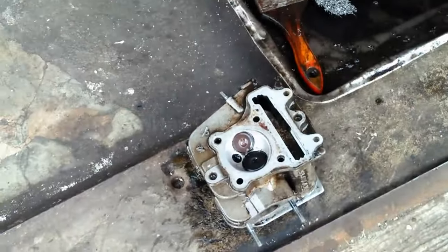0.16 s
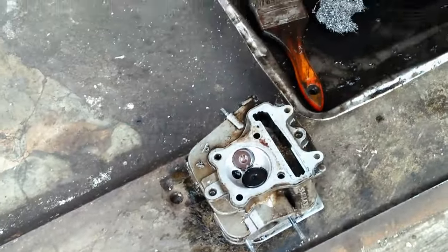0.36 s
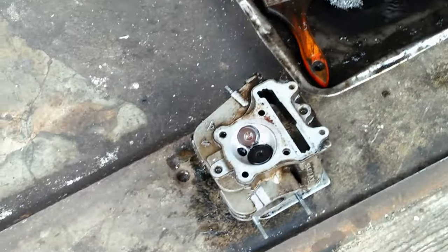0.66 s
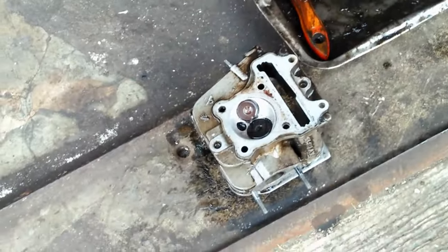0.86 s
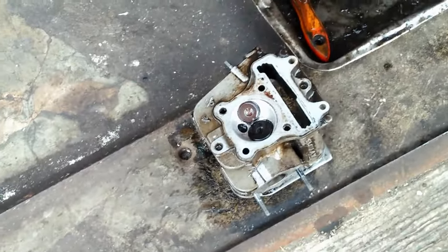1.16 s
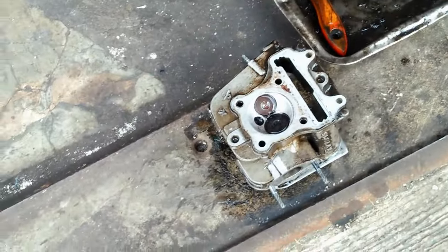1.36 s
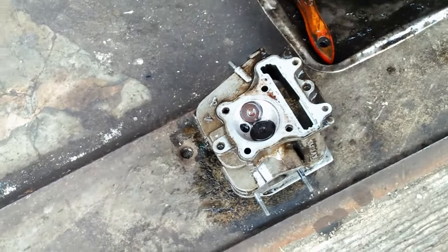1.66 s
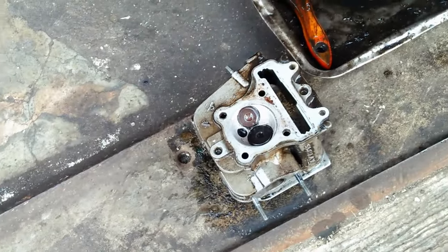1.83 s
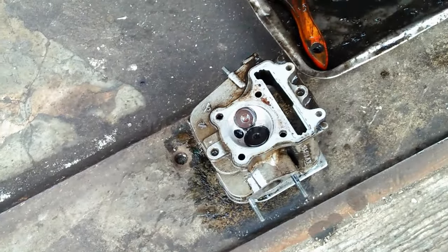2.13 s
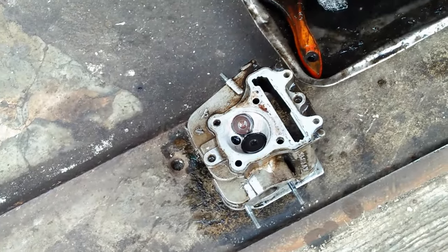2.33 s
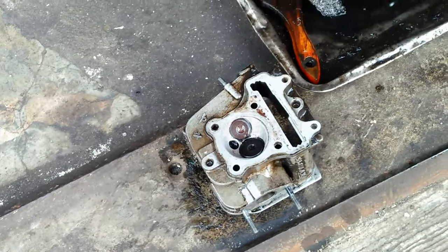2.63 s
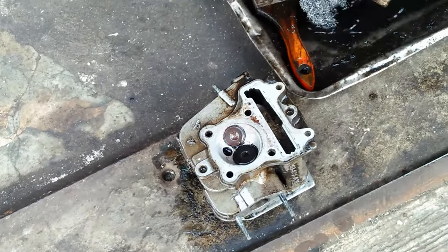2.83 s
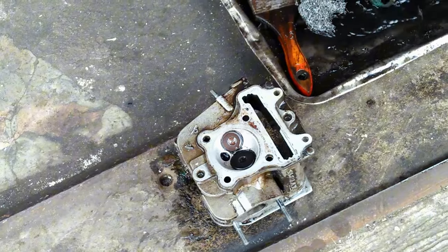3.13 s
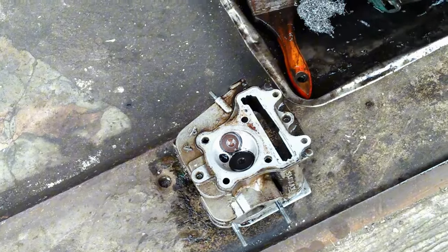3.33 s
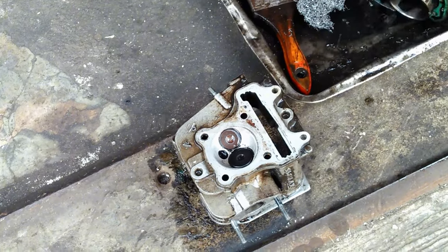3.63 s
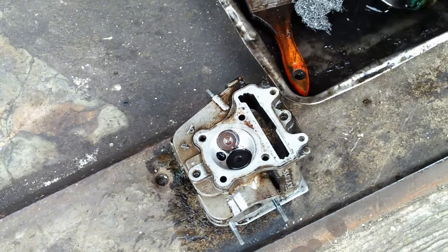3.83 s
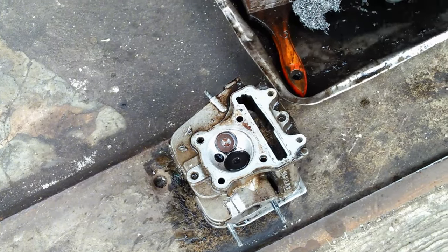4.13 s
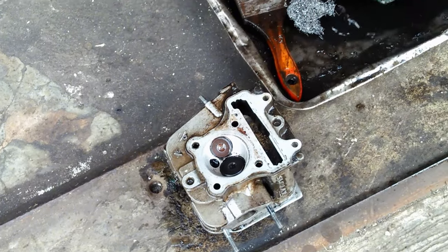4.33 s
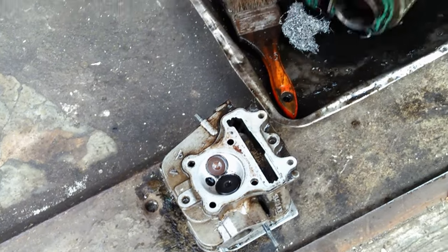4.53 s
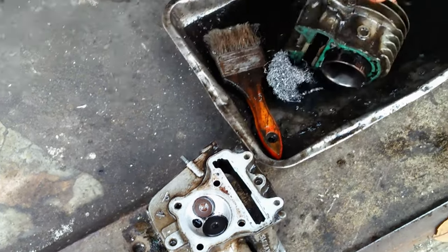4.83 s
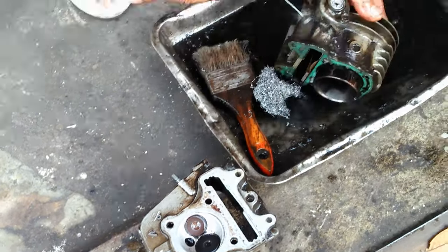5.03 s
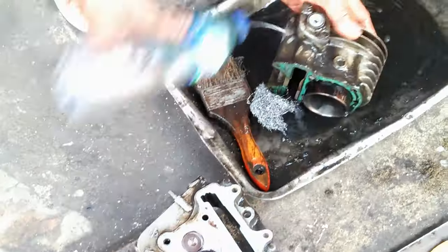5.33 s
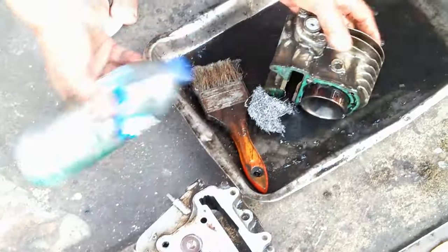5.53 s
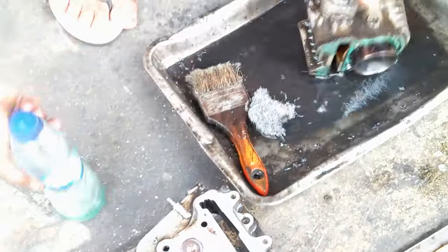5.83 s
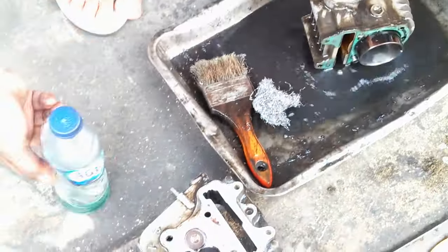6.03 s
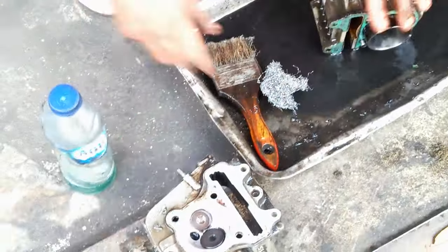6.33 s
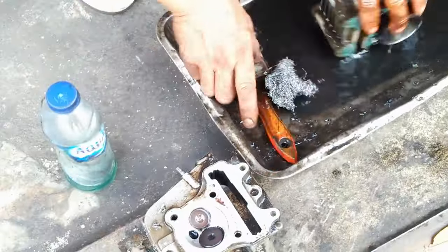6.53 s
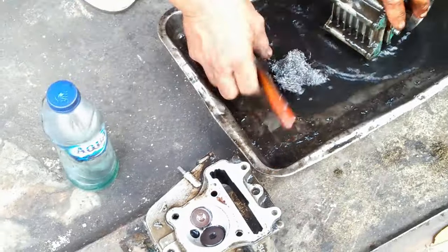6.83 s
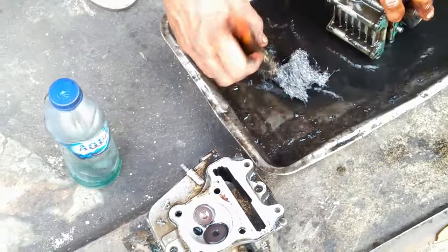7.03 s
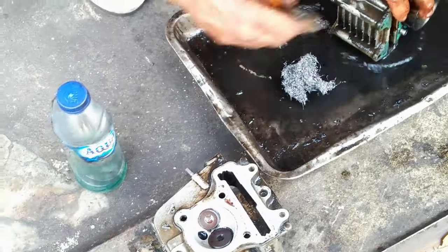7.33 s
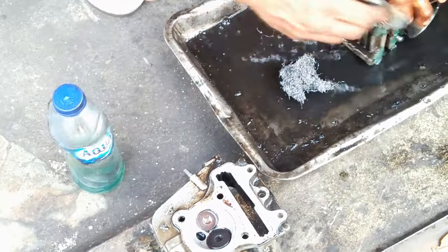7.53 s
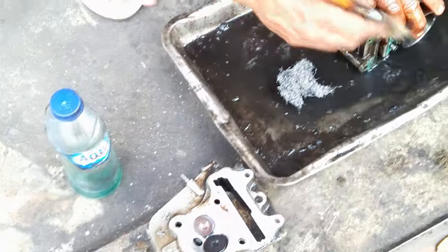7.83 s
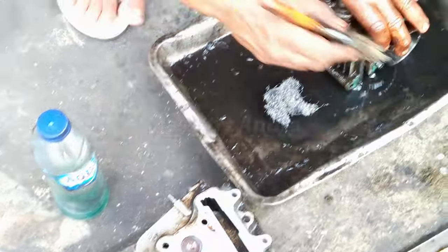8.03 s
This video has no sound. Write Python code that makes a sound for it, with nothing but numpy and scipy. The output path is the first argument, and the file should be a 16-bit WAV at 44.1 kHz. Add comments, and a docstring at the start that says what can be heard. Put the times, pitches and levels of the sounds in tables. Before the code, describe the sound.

Outdoors, close to a shallow sheet-metal tray. From 0 to 0.7 s a cast metal part clinks and scrapes with dry, very short ringing and bright grit, over faint wet hiss. From 1 to 2.4 s come sparser light knocks, a tight cluster near 1.9 s and a barely audible squeak at 1.5 s. Between 2.8 and 4.8 s knocks and slides grow busier, strongest around 3.3 and 4.7 s, with spatter ticks and brief sloshes. It is calmer around 5 s; faint clicks follow at 5.5 s, a tiny squeak at 5.8 s, a loud clank with a thud at 5.95 s and crisp taps at 6.2-6.4 s. From 6.5 s bristle hiss, scrapes and knocks thicken, with heavy hits at 7.65-8 s. Short wall echoes and a far idling motor sit behind; road roar rises from 5.5 s, and a rumbling vehicle nears at the end.

```python
"""Knocks, short scrapes and clicking taps ring a sheet-metal tray outdoors, close by: a cast engine part is
turned, rinsed and brushed. Contacts are noise bursts driving damped modes, a dry clink and bright grit.
Soft thuds, spatter ticks and two squeaks join them; solvent and bristles hiss as shaped noise with ticks.
Behind are wall echoes, road noise and a far idling motor; one vehicle draws near at the end."""
import sys
import numpy as np
from scipy import signal
from scipy.fft import rfft, irfft, next_fast_len
from scipy.io import wavfile
from scipy.ndimage import uniform_filter1d

SR = 44100
rng = np.random.default_rng(int(sys.argv[2]) if len(sys.argv) > 2 else 0)


def store_pcm(level_fs):
    """Save levels as 16-bit WAV."""
    pcm = np.round(np.clip(level_fs, -1, 1) * 32767).astype(np.int16)
    wavfile.write(sys.argv[1], SR, np.atleast_2d(pcm).T)


def amplitude_ratio(level_db):
    """Convert a level in decibels to the matching linear amplitude (field) ratio."""
    exponent = np.asarray(level_db, float) / 20
    return 10 ** exponent


N = 360738

# part knocks tray: (force peak [s], low ring [dB], high ring [dB], grit [dB], contact decay [ms])
KNOCKS = [(0.155, -44.5, -36, -40, 2.8), (0.289, -38.5, -38.5, -44.5, 16), (0.602, -63, -49, -50.5, 5.2),
          (1.175, -50.5, -56, -67, 9), (1.21, -56.5, -57, -62, 19), (1.303, -53.5, -55, -67, 14),
          (1.509, -41, -37, -51, 14.3), (1.862, -55, -46, -55, 16), (1.877, -43, -34, -41.5, 4.5),
          (1.894, -40, -37.5, -47, 6.2), (1.923, -54, -54, -53, 4.5), (2.277, -48.5, -48, -61, 36),
          (2.39, -51, -60, -64.5, 9.6), (2.826, -41.5, -41, -58.5, 21), (2.915, -38, -42.5, -55, 20.4),
          (3.131, -63, -58, -71, 12), (3.35, -42, -53, -61, 11), (3.537, -64, -52, -66, 8),
          (3.561, -39, -38, -44, 12), (3.703, -51, -48.5, -58, 24), (3.727, -46.5, -56, -60.5, 7.3),
          (4.016, -35.5, -37, -68, 18), (4.089, -52, -47, -51, 7.5), (4.279, -44.5, -43.5, -47.5, 19),
          (4.516, -56, -53.5, -62, 0.93), (4.712, -34.5, -38.5, -51, 48), (4.821, -47.5, -59, -53, 4.1),
          (5.133, -49.5, -55.5, -64, 17), (5.937, -37, -36, -57, 9), (5.952, -28, -28, -49.5, 73),
          (6.443, -56, -47, -72, 88), (6.555, -57, -42, -51, 7.3), (6.9, -40, -35, -45, 14),
          (7.09, -45, -34.5, -40, 3), (7.237, -38.5, -35, -53.5, 19), (7.655, -38, -38, -52, 18),
          (7.796, -28.5, -39, -52, 22), (7.975, -31, -29, -35, 12)]
# part slides on tray: (force peak [s], low ring [dB], high ring [dB], grit [dB], contact decay [ms])
SCRAPES = [(0.143, -44.5, -52, -76, 6), (0.315, -41.5, -34.5, -48, 19.7), (0.373, -46, -44, -57.5, 29),
           (0.478, -60, -52.5, -59.5, 10), (0.641, -66, -62, -63, 6.4), (1.035, -64, -81, -75, 13),
           (1.14, -53.5, -62, -59, 33), (1.579, -48.5, -44, -52.5, 10), (1.746, -84, -69, -69, 38),
           (2.851, -41, -39, -57, 27.6), (2.991, -48, -55, -74.5, 53), (3.082, -60, -53.5, -80, 7.8),
           (3.268, -33.5, -35, -56.5, 9.7), (3.319, -32, -30.5, -47, 16.4), (3.581, -39, -30, -42, 6.8),
           (3.789, -46.5, -41, -53.5, 6.8), (4.027, -39, -44, -61.5, 16), (4.156, -43.5, -40.5, -55, 31),
           (5.203, -62, -54.5, -79, 18), (6.101, -43.5, -43, -53, 7.7), (6.639, -47.5, -40, -55.5, 20),
           (6.681, -49, -45, -57, 24), (6.722, -58, -41.5, -60, 19), (6.828, -43.5, -36.5, -52, 20),
           (6.944, -45.5, -40.5, -71, 48), (7.046, -55, -41.5, -71, 14), (7.171, -64, -45, -64, 68),
           (7.393, -44, -61, -73, 19), (7.619, -43, -67, -74, 22), (7.688, -30, -30.5, -42.5, 18),
           (7.752, -37.5, -44, -49, 19)]
# dry, clicking taps of bottle or handle, some faint, some loud:
# (force peak [s], low ring [dB], high ring [dB], clink [dB], contact decay [ms])
TAPS = [(0.405, -51, -46, -40, 3.5), (0.561, -54, -61, -53.5, .5), (3.397, -61, -49, -48, 1.3),
        (5.477, -55, -45.5, -52, 1.7), (5.499, -61, -51, -58, 2.4), (5.538, -42, -40.5, -57.5, 1.6),
        (5.588, -49, -57, -62.5, 2), (5.627, -46.5, -51, -73, 2.4), (6.186, -46, -32.5, -43.5, 0.63),
        (6.22, -61, -58, -74, 3.7), (6.244, -40.5, -26.5, -35, 3), (6.376, -39, -29, -35.5, 4.6)]


def contacts():
    """Rows of (s, low dB, high dB, clink dB, grit dB, rise ms, contact ms, share of the ring time)."""
    rows = []
    for s, low_db, high_db, grit_db, contact_ms in KNOCKS:
        rise_ms = 0.89 * abs(contact_ms) ** 0.45
        rows.append((s, low_db, high_db, grit_db + 1.5, grit_db, rise_ms, contact_ms, 1))
    for s, low_db, high_db, grit_db, contact_ms in SCRAPES:
        rise_ms = 0.78 * contact_ms  # swells about as slowly as it fades
        rows.append((s, low_db, high_db, grit_db + 2.5, grit_db, rise_ms, contact_ms, 1))
    for s, low_db, high_db, clink_db, contact_ms in TAPS:
        # held in the hand: shorter ring, little grit
        rows.append((s, low_db, high_db, clink_db, clink_db - 10, 1.15, contact_ms, 0.61))
    return rows


# tray modes, damped by floor and solvent, before each blow's variation: (frequency [Hz], level [dB], t60 [s])
TRAY_MODES = [(590.6, -11, 0.077), (655, -9.5, 0.029), (732.4, -13, 0.055), (811, -10.5, 0.027),
              (900.7, -4.5, 0.055), (1006, -3.5, 0.036), (1057, -3.5, 0.022), (1199, 1, 0.017),
              (1246, 7, 0.014), (1473, 7, 0.029), (1520, 1, .03), (1569, 15.5, 0.018), (1655, 1, 0.06),
              (1822, 1, 0.022), (1918, -7.5, 0.069), (2028, 6, 0.017), (2221, 4, 0.016), (2371, -2.5, 0.02),
              (2405, -3.5, 0.011), (2585, -15.5, 0.043), (2890, -19.5, 0.073)]
# dry clink of the casting, too short to ring: (frequency [Hz], density [dB per Hz])
CLINK_SPECTRUM = [(1800, -35), (2700, -3), (3300, -6), (3800, -4.5), (4400, 2), (4900, -2), (5500, -9),
                  (6200, -16), (7500, -32)]
# grit: (frequency [Hz], density [dB per Hz])
GRIT_SPECTRUM = [(4500, -53), (6300, -8), (7200, 1.5), (8300, 4.5), (10500, -0.5), (12000, 1), (13800, 3),
                 (16000, -10)]
RING_SPLIT_HZ, LEAD_MS = 1200, 45


def knock(low_db, high_db, clink_db, grit_db, rise_ms, contact_ms, damp, chance):
    """An uneven burst of slips drives tray and casting and sheds bright grit."""
    ms = np.arange(8192) * 1000 / SR - LEAD_MS
    after_ms = np.maximum(ms, 0)
    rise = np.clip(1 + ms / (2.24 * max(rise_ms, 0.2)), 0, 1)
    force = rise * np.exp(-after_ms / max(contact_ms, 0.3))
    stutter = amplitude_ratio(3.16 * evened(uniform_filter1d(chance[1], size=90)))
    slips = force * stutter * chance[0]

    low_modes = [mode for mode in TRAY_MODES if mode[0] < RING_SPLIT_HZ]
    high_modes = [mode for mode in TRAY_MODES if mode[0] >= RING_SPLIT_HZ]
    low = ring(low_modes, slips, chance[2], damp=damp)
    high = ring(high_modes, slips, chance[2, 50:], hard=14 / (1 + rise_ms), damp=damp)

    # the shorter the contact, the stronger the single click added to clink and grit
    impulse = np.arange(len(ms)) == round(LEAD_MS * SR / 1000)
    click = impulse * np.linalg.norm(slips) * 1.9 / (1 + contact_ms)
    clink = colour(slips + click, CLINK_SPECTRUM)
    shed = slips * np.exp(-after_ms / 94.0)  # grit is spent sooner than the ring
    grit = colour(shed + 0.6 * click, GRIT_SPECTRUM)
    return topped(low, low_db) + topped(high, high_db) + topped(clink, clink_db) + topped(grit, grit_db)


def ring(table, drive, spot, hard=0, damp=1):
    """Drives decaying modes; the spot sets strength, sign and bend, a hard blow lifts the upper modes."""
    t = np.arange(len(drive)) / SR
    hz, db, t60 = np.transpose(table)[:, :, None]
    strength, bend = spot[:2 * len(table)].reshape(2, -1, 1)
    level_db = db + 2.5 * strength + hard * np.log2(hz / hz[0])
    modes = amplitude_ratio(level_db - 60 * t / (t60 * damp))
    modes = modes * np.sin(2 * np.pi * hz * (1 + 0.032 * bend) * t)
    modes *= np.sign(bend) * (1 - np.exp(-t * hz * 1.27))  # the metal takes a cycle to move
    return signal.fftconvolve(drive, modes.sum(0))[:len(t)]


# heavy part meets tray floor: (onset [s], loudest 7 ms rms [dB], push length [ms])
THUDS = [(0.142, -48, 9.2), (0.299, -55, 22), (3.306, -46, 36), (4.001, -49, 9.5), (5.865, -43.5, 87),
         (5.939, -50, 14), (6.365, -43.5, 16), (7.081, -51, 19), (7.217, -47.5, 35), (7.641, -37, 29),
         (7.788, -38.5, 100), (7.987, -40.5, 35)]
# whole-sheet modes, before each push's variation: (frequency [Hz], level [dB], t60 [s])
SHEET_MODES = [(163.4, -4, 0.044), (208, -3.5, 0.027), (261.8, -6, 0.12), (300, 4.5, 0.037)]


def thud(db, length_ms, chance):
    """A soft push bends the whole sheet; its force peaks at a third of the length."""
    ms = np.arange(8192) * 1000 / SR
    push = ms * np.exp(-3 * ms / max(length_ms, 1)) * chance[0]
    return topped(ring(SHEET_MODES, push, chance[1]), db)


# ticks too light to move the tray: (onset [s], peak [dB])
SPATTER = [(0.5445, -48), (0.667, -45), (0.7333, -37), (0.9911, -43), (1.0261, -45), (2.3101, -46),
           (2.806, -47), (3.1009, -51), (3.4366, -57), (3.488, -61), (3.5115, -51), (3.6855, -44),
           (3.9464, -56), (4.2123, -49), (4.4453, -50), (4.504, -44), (4.589, -60), (4.6753, -54),
           (4.789, -43), (5.5847, -53), (5.6341, -60), (5.9704, -44), (6.0297, -56), (6.0845, -47),
           (6.1464, -50), (6.35, -47), (6.8848, -31), (7.171, -41), (7.503, -30)]
# spatter: (frequency [Hz], density [dB per Hz])
SPATTER_SPECTRUM = [(2500, -34), (4500, -8.5), (6200, -15.5), (8500, -9.5), (12000, -8), (14000, 3),
                    (16000, -4)]
SPATTER_LEAD_MS = 5
TICK_DECAY_MS, FIZZ_DECAY_MS, FIZZ_RE_TICK_DB = 2.6, 12.3, -9.5


def spatter(db, chance):
    """A bright noise tick with a short fizz behind it: two exponential decays."""
    ms = np.arange(len(chance)) * 1000 / SR - SPATTER_LEAD_MS
    shape = np.exp(-ms / TICK_DECAY_MS) + amplitude_ratio(FIZZ_RE_TICK_DB) * np.exp(-ms / FIZZ_DECAY_MS)
    tick = colour((ms > 0) * shape * chance, SPATTER_SPECTRUM)
    return amplitude_ratio(db) * tick / abs(tick).max()


# a wet finger slips: (start [s], length [s], mean pitch [Hz], sine amplitude [dB])
SQUEAKS = [(1.456, 0.055, 2970, -66), (5.788, 0.037, 3280, -67)]


def squeak(length_s, hz, db, chance):
    """A brief sine, made slightly fuzzy by random pitch wobble."""
    t = np.arange(round(length_s * SR)) / SR
    wobble = 1 + 0.02 * evened(uniform_filter1d(chance, size=200))[:len(t)]
    return amplitude_ratio(db) * np.sin(np.pi * t / length_s) * np.sin(2 * np.pi * np.cumsum(hz * wobble) / SR)


# sloshes of solvent, strokes of bristles: (start [s], length [s], starting level [dB])
SLOSHES = [(0.0, 0.15, -66.5), (0.33, 0.42, -61.5), (0.945, .06, -68), (0.995, 0.26, -60),
           (1.294, .09, -66.5), (1.67, 0.15, -58), (1.907, 0.091, -54.5), (2.165, 0.27, -64),
           (2.792, 0.22, -64), (3.07, 0.078, -69), (3.413, 0.17, -66), (3.6, 0.16, -67), (3.8, 0.18, -71),
           (4.052, 0.034, -50), (4.135, 0.06, -49), (4.195, 0.22, -63.5), (4.439, .11, -61),
           (4.572, .07, -75), (4.681, 0.21, -62), (5.096, 0.1, -66), (5.4, 0.54, -72.5),
           (5.631, 0.14, -62.5), (5.878, 0.17, -64), (6.085, 0.31, -64), (6.55, 0.23, -60),
           (6.758, 0.25, -59.5), (6.96, .13, -67), (7.1, .33, -64), (7.419, 0.36, -58), (7.666, 0.52, -57),
           (7.97, 0.19, -54)]
# hiss: (frequency [Hz], density [dB per Hz])
HISS_SPECTRUM = [(1500, -10), (2500, 1.5), (2930, -10.5), (3220, -5), (3780, -10.5), (4440, -3),
                 (4990, -10.5), (6250, -15), (8230, -6), (9870, -11.5), (14200, -8), (16000, -7.5)]
SLOSH_RISE_S, SLOSH_DECAY_S, SLOSH_SAG_DB, HISS_FLOOR_DB = 0.022, 0.032, 4, -82


def hiss():
    """Smooth noise with tiny ticks of bristles and drops, which also ring the tray."""
    tick_db = 5.0 * np.minimum(rng.exponential(1, N), 5)
    ticks = amplitude_ratio(tick_db) * (rng.random(N) < 500 / SR)  # 500 per s on average
    burst = rng.standard_normal(300) * amplitude_ratio(-np.arange(300) * 0.13)
    ticks = signal.oaconvolve(ticks, burst)[:N]
    smooth = noise(HISS_SPECTRUM, size=256, patchy_db=3.2, flicker_db=2.2)
    tray_response = ring(TRAY_MODES, np.arange(4096) == 0, rng.standard_normal(2 * len(TRAY_MODES)))
    rung = signal.oaconvolve(ticks, tray_response)[:N]
    mix = evened(smooth + amplitude_ratio(-10.5) * evened(colour(ticks, HISS_SPECTRUM)))
    mix = mix + amplitude_ratio(-5) * evened(rung)

    t, power = np.arange(N) / SR, amplitude_ratio(HISS_FLOOR_DB) ** 2
    for s, length_s, db in SLOSHES:
        rise = np.clip((t - s) / SLOSH_RISE_S, 0, 1)
        fall = np.exp(-np.maximum(t - s - length_s, 0) / SLOSH_DECAY_S)
        sag_db = SLOSH_SAG_DB * np.clip((t - s) / length_s, 0, 1)
        power = power + (rise * fall * amplitude_ratio(db - sag_db)) ** 2
    return np.sqrt(power) * mix


# early echo decay: (frequency [Hz], t60 [s])
YARD_DECAY = [(300, 1), (1000, 0.28), (3000, 0.3), (8000, 0.21), (15000, 0.21)]
# echoes from farther walls: (frequency [Hz], level re early echoes [dB])
LATE_ECHOES = [(300, -30), (600, -12), (1600, -20.5), (2800, -8), (5000, -64)]
LATE_T60_S = 0.73


def yard(x):
    """Random-sign wall echoes: four random echo tails cross-fade in turn, a new one every 0.2 s."""
    out, turn = np.zeros(N), np.arange(N) * 5 / SR
    for k in range(4):
        taps, at = np.zeros(SR // 2), np.arange(80, SR // 2 - 8, 8)
        taps[at + rng.integers(0, 8, len(at))] = rng.choice([-1., 1.], len(at))
        hz, t, z = signal.stft(taps, SR, nperseg=256)
        early = amplitude_ratio(-60 * t / read(YARD_DECAY, hz)[:, None])
        late = amplitude_ratio(read(LATE_ECHOES, hz)[:, None] - 60 * t / LATE_T60_S)
        tail = signal.istft(z * (early + late), SR, nperseg=256)[1]
        share = np.cos(np.pi / 2 * np.clip((turn - k) % 4 - 2, -1, 1))
        out += signal.fftconvolve(x * share, tail / np.linalg.norm(tail))[:N]
    return out


# diffuse echoes: (frequency [Hz], diffuse share of echo power [0-1])
DIFFUSE_SHARE = [(1600, 0), (2600, .55), (5500, .8), (16000, .8)]


def diffuse(x):
    """Higher echoes are diffuse: part of their power becomes noise smoothed across frequency."""
    hz, t, z = signal.stft(x, SR, nperseg=512, noverlap=384)
    a, b = rng.standard_normal((len(t), len(hz), 2)).T
    level = np.sqrt(abs(uniform_filter1d(abs(z) ** 2, size=8, axis=0)))
    share = read(DIFFUSE_SHARE, hz)[:, None]
    diffuse_part = level * (a + 1j * b) * np.sqrt(2)
    z = np.sqrt(1 - share) * z + np.sqrt(share) * diffuse_part
    return signal.istft(z, SR, nperseg=512, noverlap=384)[1][:N]


# tyre roar: (time [s], level [dB])
ROAD_LEVEL = [(0.0, -65.5), (1.0, -64.5), (2.6, -65.5), (4.0, -62), (5.45, -59.5), (5.7, -54.5),
              (6.15, -49), (6.5, -51.5), (6.85, -44.5), (7.6, -46), (8.0, -41.5), (8.18, -44)]
# tyre roar: (frequency [Hz], density [dB per Hz])
ROAR_SPECTRUM = [(100, -19), (200, -5), (280, -2), (450, -6.5), (600, -4), (900, -1.5), (1100, -0.5),
                 (1300, -4), (1700, -2), (2300, -11), (2800, -19), (3500, -27), (4500, -30), (6500, -66)]
# far rumble, then the vehicle arriving, before flutter: (time [s], level [dB])
RUMBLE_LEVEL = [(0.0, -58.5), (0.5, -70), (0.85, -59.5), (1.6, -67.5), (3.2, -62.5), (6.4, -67.5),
                (6.85, -63.5), (7.7, -51.5), (7.93, -42.5), (8.18, -46)]
# rumble: (frequency [Hz], density [dB per Hz])
RUMBLE_SPECTRUM = [(20, -33), (40, -1.5), (65, 9.5), (100, 4.5), (160, 0), (220, -8.5), (320, -7.5),
                   (470, -7.5), (700, -40)]
# wavering tones of the nearing vehicle: (frequency [Hz], half-width [Hz], level re rumble [dB])
ENGINE_TONES = [(64.5, 5.5, -21), (126.6, 5.3, -17.5)]


def road():
    """Tyre roar and a lumpy, fluttering rumble, with engine tones as narrow bands of noise."""
    hz = np.fft.rfftfreq(N, 1 / SR)
    rumble = noise(RUMBLE_SPECTRUM, size=4096, patchy_db=-1.0, flicker_db=-0.5)
    for tone_hz, width_hz, db in ENGINE_TONES:
        band = rfft(rng.standard_normal(N)) / (1 + ((hz - tone_hz) / width_hz) ** 2)
        rumble += amplitude_ratio(db) * evened(irfft(band, N))
    roar = noise(ROAR_SPECTRUM, size=1024, patchy_db=2.0, flicker_db=0.5)
    flutter = amplitude_ratio(2.55 * slow(17.7))
    bass = flutter * curve(RUMBLE_LEVEL, index=1) * evened(rumble)
    return curve(ROAD_LEVEL, index=1) * roar + bass


# far idling motor, before swell and waver: (mean frequency [Hz], level at start [dB], fade [dB/s])
IDLE_TONES = [(81.3, -77.5, -1.2), (105.7, -81.5, -2.2), (132.8, -69.5, 1), (166, -68.5, 3.5),
              (195, -74, 2)]
# the motor swells once: (time [s], gain [dB])
IDLE_SWELL = [(0, 1), (.45, -4), (.7, 5.5), (1.1, 5), (1.7, 3), (2.1, -0.5), (8.18, -4.5)]


def idle():
    """Thin sines whose level and pitch waver a little, under one swell."""
    t, out = np.arange(N) / SR, np.zeros(N)
    for hz, db, fade in IDLE_TONES:
        level = amplitude_ratio(db - fade * t + 3.3 * slow(3.8))
        out += level * np.sin(2 * np.pi * np.cumsum(hz + 0.89 * slow(1.86)) / SR)
    return curve(IDLE_SWELL, index=1) * out


def noise(points, size, patchy_db, flicker_db):
    """Random short-time spectra with drifting patches and a flicker shared by all bins."""
    frames, hz = 4 * N // size + 5, np.fft.rfftfreq(size, 1 / SR)
    a, b, patches = rng.standard_normal((frames, len(hz), 3)).T
    patches = uniform_filter1d(patches, size=10, axis=0)
    patches = evened(uniform_filter1d(patches, size=10, axis=1))
    flicker = evened(uniform_filter1d(rng.standard_normal(frames), size=5))
    level_db = read(points, hz)[:, None] + patchy_db * patches + flicker_db * flicker
    z = (a + 1j * b) * amplitude_ratio(level_db)
    return evened(signal.istft(z, nperseg=size, noverlap=size * 3 // 4)[1][:N])


def slow(corner_hz):
    """A random drift of rms 1: noise low-passed at the corner."""
    hz = np.fft.rfftfreq(N, 1 / SR)
    return evened(irfft(rfft(rng.standard_normal(N)) / (1 + (hz / corner_hz) ** 4), N))


def evened(x):
    """Scales to rms 1."""
    return x / np.sqrt(np.mean(x ** 2) + 1e-20)


def topped(x, db):
    """Sets the rms of the loudest 300 samples (7 ms)."""
    return amplitude_ratio(db) * x / np.sqrt(uniform_filter1d(x ** 2, size=300).max())


def read(points, hz):
    """Interpolates a spectrum table over log frequency."""
    f, value = np.transpose(points)
    return np.interp(np.log(hz + 1), np.log(f + 1), value)


def curve(rows, index):
    """One dB column as a gain for every sample."""
    rows = np.array(rows)
    return amplitude_ratio(np.interp(np.arange(N) / SR, rows[:, 0], rows[:, index]))


def colour(x, points):
    """Shapes x by a spectrum table."""
    size = next_fast_len(len(x))
    gain = amplitude_ratio(read(points, np.fft.rfftfreq(size, 1 / SR)))
    return irfft(rfft(x, size) * gain, size)[:len(x)]


def add(mix, s, sound):
    """Lays a sound into the mix at time s."""
    part = mix[max(round(s * SR), 0):][:len(sound)]
    part += sound[:len(part)]


# what the walls return: (frequency [Hz], gain [dB])
WALL_RETURN = [(300, 0), (1500, 0), (4000, -2), (8000, 0.5), (14000, -4.5)]


def scene():
    """Sums tray sounds, their echoes, hiss, road and motor, all in front of the microphone."""
    tray, rows = np.zeros(N), contacts()
    for (s, *row), chance in zip(rows, rng.standard_normal((len(rows), 3, 8192))):
        add(tray, s - LEAD_MS / 1000, knock(*row, chance))
    for (s, *row), chance in zip(THUDS, rng.standard_normal((len(THUDS), 2, 8192))):
        add(tray, s, thud(*row, chance))
    for (s, db), chance in zip(SPATTER, rng.standard_normal((len(SPATTER), 4096))):
        add(tray, s - SPATTER_LEAD_MS / 1000, spatter(db, chance))
    for (s, *row), chance in zip(SQUEAKS, rng.standard_normal((len(SQUEAKS), 8192))):
        add(tray, s, squeak(*row, chance))
    echoes = amplitude_ratio(-8.0) * diffuse(yard(colour(tray, WALL_RETURN)))
    mid = tray + echoes + hiss() + road() + idle()
    return np.array([mid, mid])


def low_pass(x):
    """Removes everything above the highest recorded frequency."""
    return signal.sosfilt(signal.butter(12, 15140, fs=SR, output="sos"), x)


# floor bounce cancels narrow bands, microphone cuts both ends: (frequency [Hz], gain [dB])
PATH_RESPONSE = [(25, -13), (50, -2), (335, -4.5), (374, -16), (415, -2), (490, -1), (525, -15), (565, -2),
                 (650, -1), (680, -7), (715, 0), (14200, 0.5), (14450, -27), (16000, -40)]
# treble side noise: (frequency [Hz], share of patches [0-1])
SIDE_SHARE = [(4000, 0), (4600, .05), (6000, .25), (8000, .55), (11000, .55), (14000, .6)]


def record(dry):
    """Applies the path, keeps the mix central and adds treble patches of side noise."""
    hz, t, z = signal.stft(colour(dry[0], PATH_RESPONSE), SR, nperseg=1024, noverlap=768)
    a, b, c = rng.standard_normal((len(t), len(hz), 3)).T
    field = uniform_filter1d(uniform_filter1d(c, size=30, axis=0), size=7, axis=1)
    rank = field.ravel().argsort().argsort().reshape(field.shape) / field.size
    patches = rank < read(SIDE_SHARE, hz)[:, None]
    level = np.sqrt(uniform_filter1d(abs(z) ** 2, size=16, axis=0) / 2)
    side = patches * level * (a + 1j * b)
    both = signal.istft(np.array([z + side, z - side]), SR, nperseg=1024, noverlap=768)[1][:, :N]
    return low_pass(both)


dry = scene()
out = record(dry)
store_pcm(out)
```